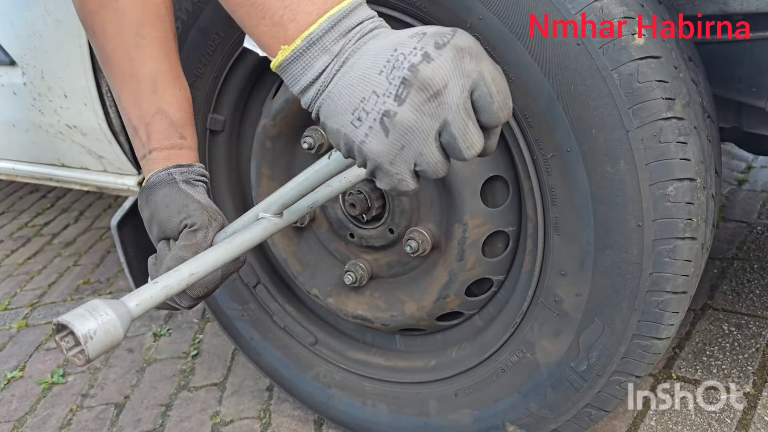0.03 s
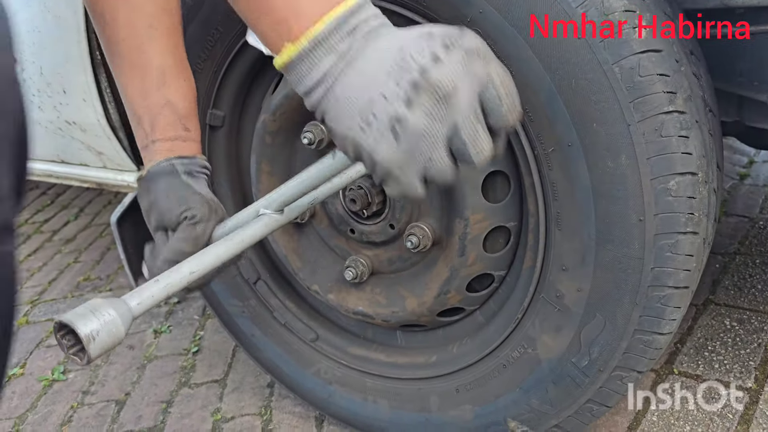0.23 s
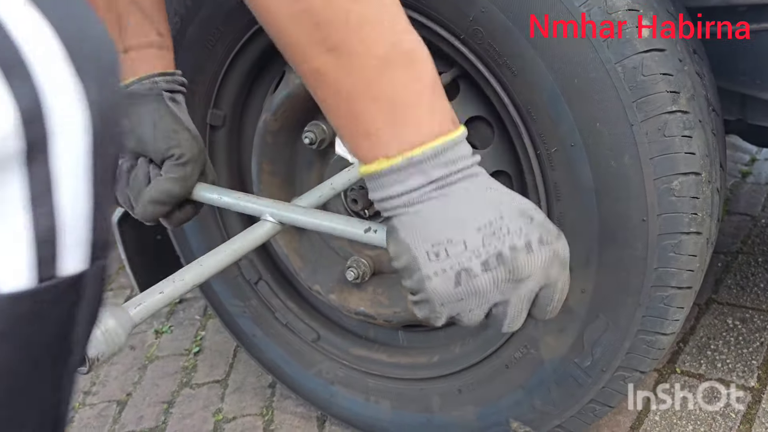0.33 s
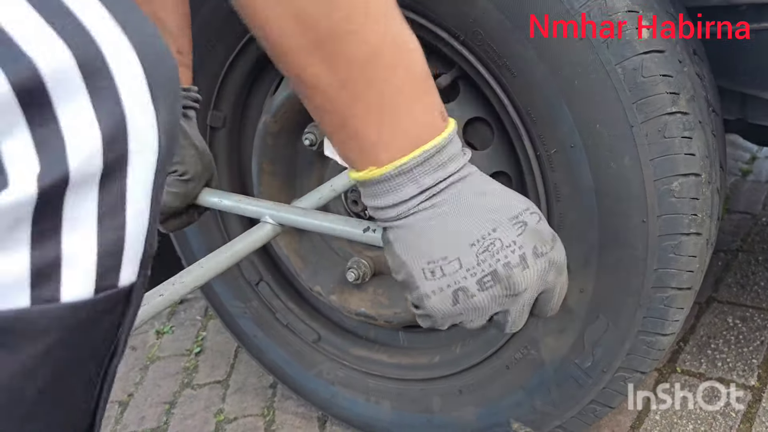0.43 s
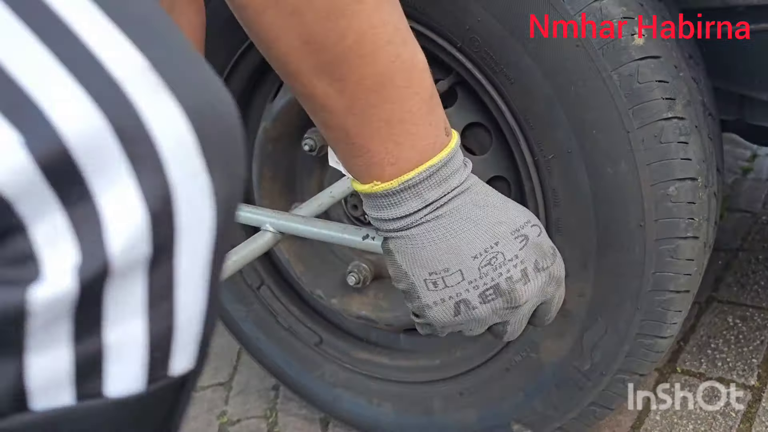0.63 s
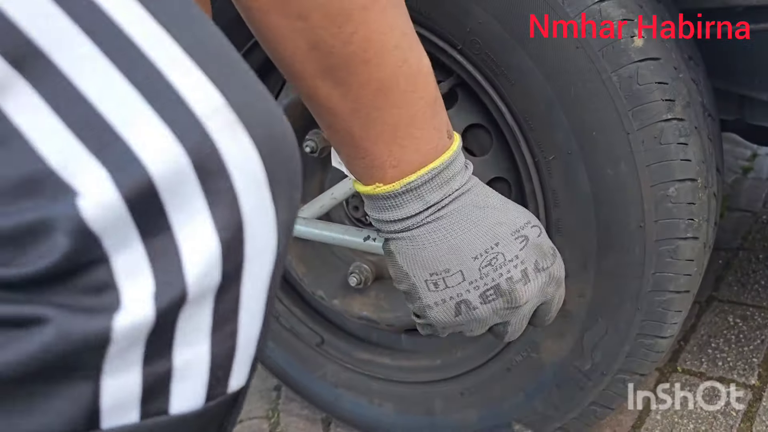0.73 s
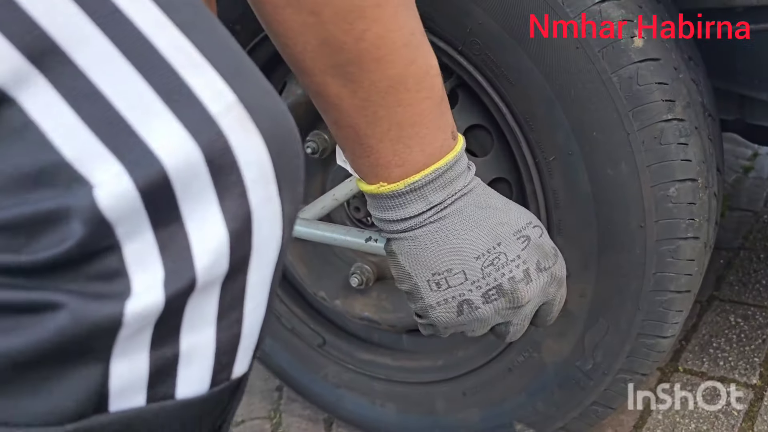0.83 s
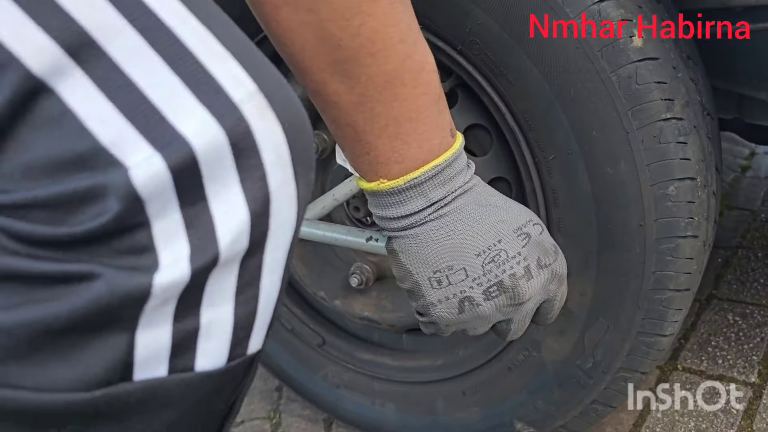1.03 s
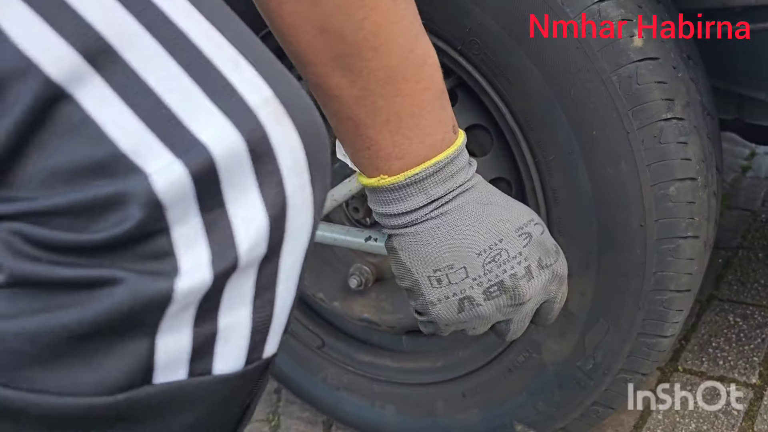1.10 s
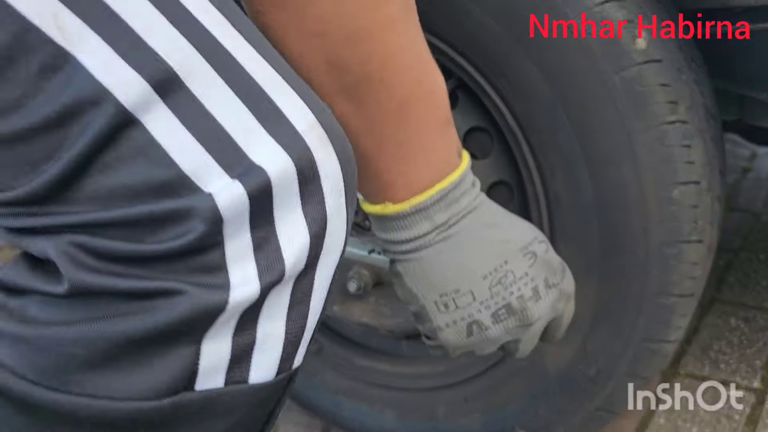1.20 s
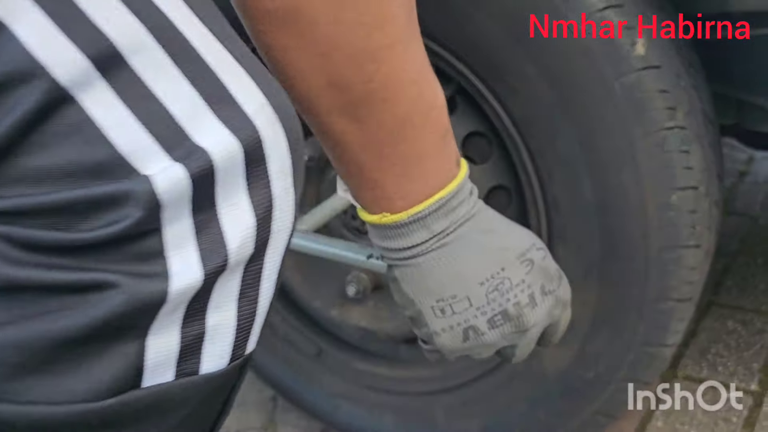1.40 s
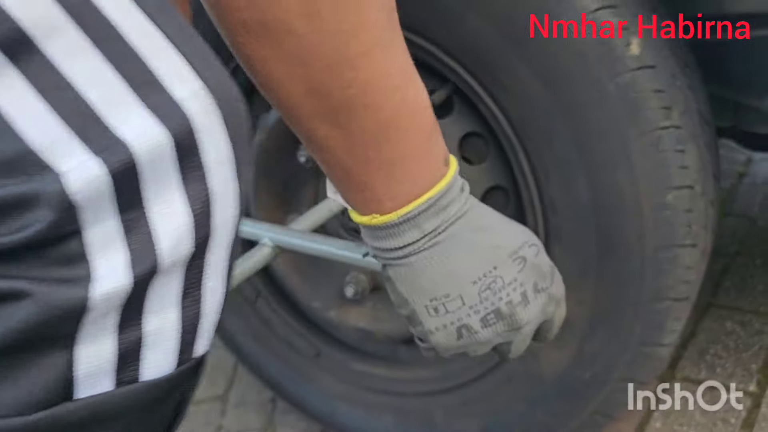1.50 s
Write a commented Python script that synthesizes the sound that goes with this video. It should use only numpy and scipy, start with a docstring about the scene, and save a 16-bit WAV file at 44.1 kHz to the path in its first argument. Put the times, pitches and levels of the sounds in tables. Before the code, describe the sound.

A tight wheel nut cracks loose under a cross wrench with one short metallic screech that echoes briefly in the street. Gloves then scuff and knock softly on the wrench, close by, over a low rumble and hum.

```python
"""A seized wheel nut cracks loose under a cross wrench, close by, on a paved street.
For 70 ms it sticks and slips on its seat: each slip strikes the modes of wrench and steel rim, and
friction sustains them as a screech. The seat squeals, the wheel groans at the slip rate, the socket
and the air in the tyre ring on, and the street echoes. Then gloves scuff and knock on the wrench,
with faint squeaks, over a low rumble and hum."""
import sys
import numpy as np
from scipy import signal
from scipy.fft import rfft, irfft, next_fast_len
from scipy.io import wavfile
from scipy.ndimage import map_coordinates

SR = 44100
rng = np.random.default_rng(int(sys.argv[2]) if len(sys.argv) > 2 else 0)


def persist_wave(psi):
    """Save psi, clipped to +-1, as 16-bit WAV."""
    counts = np.round(np.clip(psi, -1, 1) * 32767).astype(np.int16)
    wavfile.write(sys.argv[1], SR, np.atleast_2d(counts).T)


N = 68355
t = np.arange(N) / SR
BREAK_S = .2075  # the nut lets go
LEFT_LEADS = np.array([[1], [-1]])


def amp(db):
    return 10 ** (np.asarray(db) / 20)


def unit_rms(x):
    return x / np.sqrt(np.mean(x ** 2) + 1e-20)


def pan(left_over_right_db):
    """Constant-power law: left and right gains for a level difference."""
    return unit_rms(amp([[left_over_right_db / 2], [-left_over_right_db / 2]]))


def at_frequency(points, hz):
    """Interpolation of (frequency, value) points on a log axis."""
    frequencies, values = np.transpose(points)
    return np.interp(np.log(hz + 1), np.log(frequencies + 1), values)


def curves(rows):
    """Linear interpolation in time of each column after the first."""
    times, *columns = np.transpose(rows)
    return [np.interp(t, times, column) for column in columns]


def phase_of(hz):
    """Phase is the time integral of frequency."""
    return 2 * np.pi * np.cumsum(hz) / SR


def gate_until(end_s, release_s=.01):
    """Opens as the nut lets go and decays exponentially after end_s."""
    return (t >= BREAK_S) * np.exp(-np.maximum(t - end_s, 0) / release_s)


def wobble(knots_per_s):
    """Smooth random modulation: a spline through Gaussian values."""
    return map_coordinates(rng.standard_normal(int(N * knots_per_s / SR) + 4), [t * knots_per_s])


def filtered(x, response):
    """Linear filtering: the spectrum times a frequency response."""
    size = next_fast_len(N + SR // 2)
    return irfft(rfft(x, size) * response(np.fft.rfftfreq(size, 1 / SR)), size)[..., :N]


# Likeness of left and right: frequency_hz, correlation
STEREO_CORRELATION = [(100, 0.9847), (500, 0.75), (1200, 0.66), (3000, .05), (12000, -.1)]

def noise(spectrum, tilt_db_per_octave=0):
    """Partial coherence: stereo noise of rms 1, alike in the bass and unrelated in the treble."""
    def mid_side_gains(hz):
        angle = np.arccos(np.clip(at_frequency(STEREO_CORRELATION, hz), -1, 1)) / 2
        colour = amp(at_frequency(spectrum, hz) + tilt_db_per_octave * np.log2(hz + 1))
        return colour * [np.cos(angle), np.sin(angle)]
    mid, side = filtered(rng.standard_normal((2, N)), mid_side_gains)
    return unit_rms(np.array([mid + side, mid - side]))


# Spectra of the street's rumble and hiss: frequency_hz, relative_db
RUMBLE_SPECTRUM = [(15, -20), (30, -3.5), (70, 2.5), (125, -2), (165, -11), (230, -11), (330, -23.5),
                   (550, -30), (900, -43), (1500, -79.5)]
HISS_SPECTRUM = [(200, -8.5), (400, -7), (550, 0), (750, -6.5), (1000, -10), (2000, -6), (3000, -13),
                 (5500, -13), (9000, -22.5), (13000, -21.5), (16000, -29)]
# Swell of the rumble: time_s, gain_db
RUMBLE_SWELL = [(0, 0), (.45, 2), (.6, -4.5), (.78, -3), (.95, -2), (1.55, 0.5)]

def ambience(rumble_db=-44.5, hiss_db=-69):
    """Broadband ambient noise: street rumble and faint hiss under slow amplitude modulation."""
    rumble = amp(rumble_db + curves(RUMBLE_SWELL)[0] + .84 * wobble(9.9)) * noise(RUMBLE_SPECTRUM)
    hiss = amp(hiss_db + .91 * wobble(5)) * noise(HISS_SPECTRUM)
    return rumble + hiss


# Glove strokes: peak_s, level_db, rise_s, fall_s, tilt_db_per_octave
SCUFFS = [(.19, -57, 0.14, 0.07, 1), (.782, -56.5, 0.0087, 0.014, -3.5), (.819, -49, 0.00688, 0.02124, -1),
          (.87, -64, 0.0295, .05, -2.5), (1.04, -69.5, 0.0134, 0.0402, 0.5),
          (1.165, -62.5, .025, 0.0653, -1.89), (1.228, -60.5, 0.0099, 0.039, -1),
          (1.47, -61, 0.0386, 0.0464, -0.97), (1.54, -56.5, 0.046, 0.056, -5)]
# Spectrum of glove on steel: frequency_hz, relative_db
SCUFF_SPECTRUM = [(240, -19.5), (450, -6), (900, -5.5), (1600, -7), (3100, -4), (4000, -6.5), (5200, -3),
                  (7000, -7.5), (10000, -10), (16000, -12.5)]

def glove_scuffs():
    """Sliding friction: each stroke of a glove along the steel is a swell of noise."""
    out = np.zeros((2, N))
    for peak_s, level_db, rise_s, fall_s, tilt in SCUFFS:
        envelope = np.exp(-np.where(t < peak_s, ((peak_s - t) / rise_s) ** 2, (t - peak_s) / fall_s))
        out += amp(level_db + 1.2 * wobble(440)) * envelope * noise(SCUFF_SPECTRUM, tilt)
    return out


# The nut's turn: time_s, friction_db, slip_rate_hz
NUT_TURN = [(0.206, 0.5, 250), (.222, 1, 246), (.236, -0.5, 245.9), (.25, 0.5, 200), (.262, -1, 140),
            (0.276, -1.5, 110), (.284, -17, 63), (.295, -21, 64)]

def stick_slip():
    """Relaxation oscillation of the nut: the friction force and the running count of slips."""
    friction_db, slip_rate_hz = curves(NUT_TURN)
    force = amp(friction_db) * gate_until(NUT_TURN[-1][0])
    cycles = np.cumsum(slip_rate_hz * (t >= BREAK_S)) / SR
    return force, cycles


def slip_blows(force, cycles, grit_per_s=2600, grit_db=-2.5, jitter_s=.00015):
    """Impulsive excitation: one blow for each slip, with crushed rust between them."""
    onsets = np.flatnonzero(np.diff(np.ceil(cycles))) + 2
    blows = rng.standard_normal(N) * (rng.random(N) < grit_per_s / SR) * amp(grit_db)
    delays = np.abs(rng.standard_normal(N)[:len(onsets)]) * jitter_s * SR
    blows[np.minimum(onsets + delays.astype(int), N - 1)] += 1
    blows[onsets[0]] += 1.2  # the first slip is the hardest
    return blows * force


# Modes of the steel rim and the wrench: pitch_hz, bandwidth_hz, relative_db, left_over_right_db
RIM_MODES = [(519.35, 12, -37, 0.5), (1458.8, 70, -30, -1.5), (1600, 54, -34.5, 6), (2164.3, 73, -31, 6.5),
             (3032, 80, -31, -4.5), (3183, 30, -28.5, -3), (3482.5, 23, -25.5, -6), (3687.6, 25, -23.5, -2),
             (3878.5, 24, -25, -9.5)]
WRENCH_MODES = [(4670, 85, -20.5, -6), (4980, 60, -29, 2.5), (5177, 35, -26.5, -2), (5501, 35, -26, 6),
                (6272, 70, -25.5, -2.5), (6450, 53, -29, -2), (7341, 70, -24, 0), (7428, 50, -31, 3.5),
                (7643, 70, -27, -8.5), (8010, 66, -32.5, 3.5), (8950, 53, -38, 0), (9600, 80, -36.5, -6),
                (11200, 72, -36, -4.5), (12065, 78, -35.5, 1.5)]

def screech(force, cycles, gain_db=-.5, sustain_db=-3, waver_hz=18, flutter_db=3.5):
    """Modal resonance: the slips strike rim and wrench, and friction keeps each mode singing."""
    def unit_energy(z):
        return z / np.linalg.norm(z.real)
    size = next_fast_len(N)
    hz = np.fft.rfftfreq(size, 1 / SR)
    drive = rfft(slip_blows(force, cycles), size)
    tilt_db_per_octave = -75 * np.clip(t - BREAK_S, 0, .07)  # darkens as the nut slows
    out = np.zeros((2, N))
    for k, (pitch_hz, width_hz, level_db, pan_db) in enumerate(RIM_MODES + WRENCH_MODES):
        resonance = 1j * hz * width_hz / (pitch_hz ** 2 - hz ** 2 + 1j * hz * width_hz)
        struck = np.fft.ifft(drive * resonance, size)[:N] * (t >= BREAK_S)
        phase = 2 * np.pi * rng.random() + phase_of(pitch_hz + waver_hz * wobble(120))
        sustained = force * amp(flutter_db * wobble(150)) * np.exp(1j * phase)
        darkening = amp(tilt_db_per_octave * np.log2(pitch_hz / 4188))
        ring = unit_energy((unit_energy(struck) + amp(sustain_db) * unit_energy(sustained)) * darkening)
        lead_rad = (-1) ** k * .7 * min(pitch_hz / 2200, 1)  # early on one side, late on the other
        out += amp(level_db + gain_db) * pan(pan_db) * (ring * np.exp(1j * lead_rad * LEFT_LEADS)).real
    return np.linalg.norm(force) * out


# Dense resonances of the steel: frequency_hz, relative_db
RASP_SPECTRUM = [(100, -12), (300, -5.5), (520, -8.5), (900, -4.5), (1300, -2.5), (1850, -7), (2500, -9),
                 (3500, -1), (4150, -8), (4700, 2), (5900, -5.5), (7400, -1), (8600, -13), (10400, -23.5),
                 (11800, -9), (13000, -18), (16000, -16.5)]

def rasp(force, cycles, level_db=-16, drop_db=5):
    """Modal overlap: dense steel resonances merge into noise that drops within each slip."""
    return force * amp(level_db - drop_db * (cycles % 1 - .5)) * noise(RASP_SPECTRUM)


# Note of the nut's seat: time_s, pitch_hz, level_db
SEAT_NOTE = [(0.208, 1420, -25.5), (0.213, 1310, -23.5), (0.22, 1242, -18.5), (.231, 1240, -16.5),
             (.239, 1227, -26.5), (.248, 1285, -15), (.258, 1296, -15.5), (0.264, 1280, -27.5),
             (.277, 1281, -22), (.3, 1283, -44.5)]

def seat_squeal(pan_db=9, lead_rad=.37):
    """Friction-induced oscillation: the nut's seat sings one wavering note."""
    pitch_hz, level_db = curves(SEAT_NOTE)
    phase = phase_of(pitch_hz * (1 + .012 * wobble(300)))
    note = np.sqrt(2) * np.sin(phase + lead_rad * LEFT_LEADS)
    return pan(pan_db) * amp(level_db + wobble(250)) * note * gate_until(SEAT_NOTE[-1][0])


def socket_ring(pitch_hz=13360, level_db=-45, decay_from_s=.275, t60_s=.48):
    """Free decay: a very high mode of the socket builds up during the turn and rings on."""
    swell = np.clip((t - BREAK_S) / .035, 0, 1)
    decay = amp(level_db - 60 * np.maximum(t - decay_from_s, 0) / t60_s)
    return np.sqrt(2) * swell * decay * np.sin(phase_of(pitch_hz + 14 * wobble(70)))


# Envelope of the wheel's groan: time_s, level_db
GROAN_ENVELOPE = [(0.203, -39.5), (0.218, -27), (0.24, -28.5), (0.249, -38), (0.267, -26.5), (.29, -30),
                  (.33, -39), (.36, -77.5)]

def wheel_groan(cycles):
    """Forced vibration: wheel and tyre shake once per slip, dropping to a thump as the nut slows."""
    phase = 2 * np.pi * cycles
    shake = np.sin(phase) + amp(-6) * np.sin(2 * phase)
    envelope = amp(curves(GROAN_ENVELOPE)[0]) * gate_until(GROAN_ENVELOPE[-1][0])
    return pan(2.1) * np.sqrt(2) * envelope * shake


def tyre_cavity(pitch_hz=177.8, level_db=-39.5, peak_s=.34, t60_s=.884):
    """Cavity resonance: the air in the tyre swells into a tone after the jolt and dies away."""
    swell = np.clip((t - BREAK_S) / (peak_s - BREAK_S), 0, 1)
    decay = amp(level_db - 60 * np.maximum(t - peak_s, 0) / t60_s)
    return swell * decay * np.sin(phase_of(pitch_hz + 4 * wobble(30)))


# Reverberation time of the street: frequency_hz, t60_s
STREET_DECAY = [(100, 0.65), (400, .4), (800, .4), (1400, 0.9), (3500, .75), (7000, .65), (11000, .45),
                (16000, .3)]
# Colour of the distant reflections: frequency_hz, gain_db
STREET_COLOUR = [(60, -4), (170, 4.5), (300, -8.5), (400, -12.5), (520, -5), (900, -14), (1400, -2.5),
                 (2000, 0), (2500, -1.5), (3400, 3), (4600, -9.5), (5600, -3), (7500, -5.5), (10000, -8),
                 (16000, -16)]

def street_echo(source):
    """Reverberation by convolution: close reflections, a late echo from a wall and a diffuse tail."""
    def unit_energy(response):
        return response / np.linalg.norm(response[0])

    def reflections(delay_s, t60_s):
        envelope = (t > delay_s) * amp(-60 * np.abs(t - delay_s) / t60_s)
        return unit_energy(rng.standard_normal((2, N)) * envelope)
    band_hz, frame_s, spectra = signal.stft(rng.standard_normal((2, N)), SR, nperseg=256)
    decay = amp(-60 * frame_s / at_frequency(STREET_DECAY, band_hz)[:, None])
    tail = signal.istft(spectra * decay, SR, nperseg=256)[1][:, :N]
    far = amp(-25.5) * unit_energy(tail) + amp(-29.5) * reflections(delay_s=.125, t60_s=.14)
    near = amp(-14) * reflections(delay_s=.001, t60_s=.1)  # car body and paving
    response = near + filtered(far, lambda hz: amp(at_frequency(STREET_COLOUR, hz)))
    bass = filtered(response, lambda hz: 1 / (1 + (hz / 500) ** 4))
    response = response - bass + bass[0]  # both sides share one bass
    return signal.fftconvolve(source, response, axes=1)[:, :N]


# Knocks of hand and wrench: start_s, level_db, pitch_hz, t60_s
KNOCKS = [(.813, -40.5, 68, 0.0915), (.876, -40, 238, 0.0346), (.921, -33, 105, 0.042),
          (1.14, -51, 448.5, 0.17), (1.469, -43.5, 680, 0.028), (1.469, -44.5, 1127, 0.0167),
          (1.222, -59, 1238, 0.106)]

def knocks(attack_s=.001):
    """Damped oscillation: each soft knock of hand and wrench is a decaying sinusoid."""
    out = np.zeros(N)
    for start_s, level_db, pitch_hz, t60_s in KNOCKS:
        age = np.maximum(t - start_s, 0)
        envelope = amp(level_db - 60 * age / t60_s) * (1 - np.exp(-age / attack_s))
        out += envelope * np.sin(2 * np.pi * pitch_hz * age)
    return out


# Squeaks and scrapes: peak_s, half_length_s, pitch_hz, glide_hz_per_s, level_db, bandwidth_ratio
SQUEAKS = [(.828, 0.01507, 3096, -10000, -56, 0.589), (0.982, 0.04, 578.6, -0.5, -65, 0.0709),
           (1.03, 0.131, 2517, 2, -75.5, 0.206), (1.059, 0.034, 454, 1.5, -63, 0.062),
           (1.229, 0.0075, 10580, -0.5, -63, .3), (1.376, 0.016, 532.9, 0.5, -62, 0.0607),
           (1.512, 0.069, 1949, 1501, -68, 0.1154)]

def squeaks():
    """Narrowband friction noise: faint, rough squeaks and scrapes as the wrench is turned further."""
    out = np.zeros(N)
    for peak_s, half_length_s, pitch_hz, glide_hz_per_s, level_db, bandwidth_ratio in SQUEAKS:
        phase = phase_of(pitch_hz + glide_hz_per_s * (t - peak_s))
        width_hz = bandwidth_ratio * pitch_hz
        band = unit_rms(wobble(width_hz) * np.sin(phase) + wobble(width_hz) * np.cos(phase))
        out += amp(level_db) * np.exp(-((t - peak_s) / half_length_s) ** 2) * band
    return out


# Course of the low hum: time_s, pitch_hz, level_db
HUM_COURSE = [(.9, 95.6, -60), (1.0, 100, -41), (1.075, 104, -38.5), (1.18, 109.4, -41.5),
              (1.26, 113.5, -38.5), (1.315, 108.4, -47.5), (1.355, 114.6, -39.5), (1.46, 117.1, -44.5),
              (1.55, 104.4, -41.5)]
# Its partials: harmonic_number, relative_db
HUM_HARMONICS = [(1, -0.5), (2, -23), (4, -34), (5, -35)]

def hum():
    """A harmonic series on a wavering fundamental: a low hum that comes up at about 1 s."""
    pitch_hz, level_db = curves(HUM_COURSE)
    phase = phase_of(pitch_hz * (1 + .02 * wobble(40)))
    return np.sqrt(2) * sum(amp(level_db + relative_db + .81 * wobble(30)) * np.sin(number * phase)
                            for number, relative_db in HUM_HARMONICS)


def scene():
    """Superposition of all the sources; only the crack of the nut excites the street's echo."""
    force, cycles = stick_slip()
    crack = screech(force, cycles) + rasp(force, cycles)
    crack += seat_squeal() + socket_ring() + wheel_groan(cycles)
    ringing = street_echo(crack) + tyre_cavity()
    handling = glove_scuffs() + knocks() + squeaks()
    return crack + ringing + handling + hum() + ambience()


def record(dry):
    """Soft saturation rounds the loudest peaks; a steep low-pass limits the band to 16 kHz."""
    rounded = dry / (1 + np.abs(dry) ** 6) ** (1 / 6)
    return filtered(rounded, lambda hz: 1 / (1 + (hz / 16000) ** 120))


dry = scene()
out = record(dry)
persist_wave(out)
```